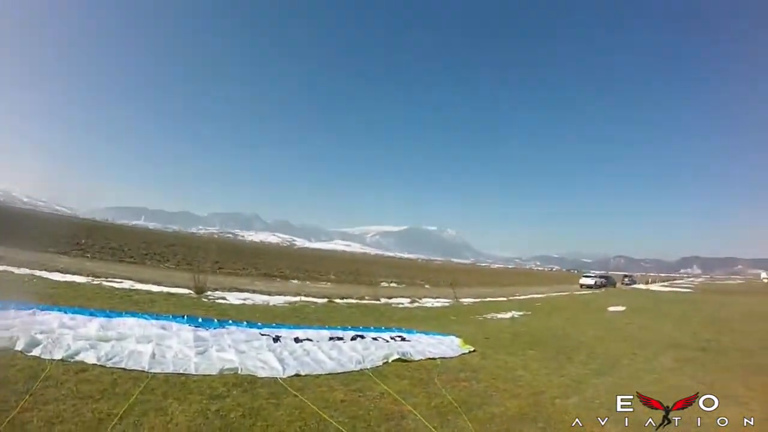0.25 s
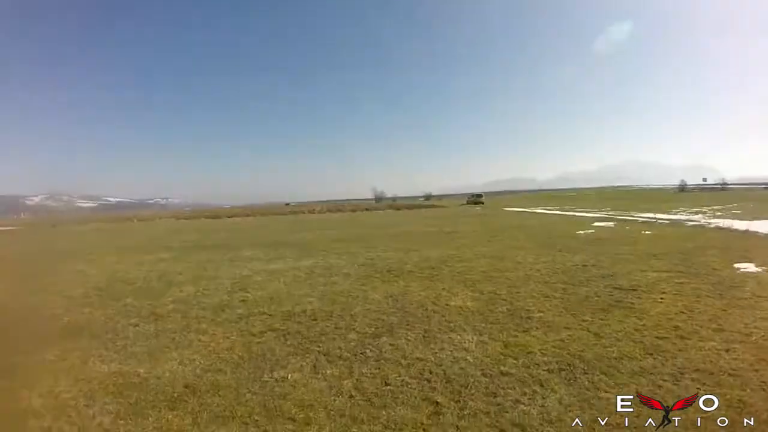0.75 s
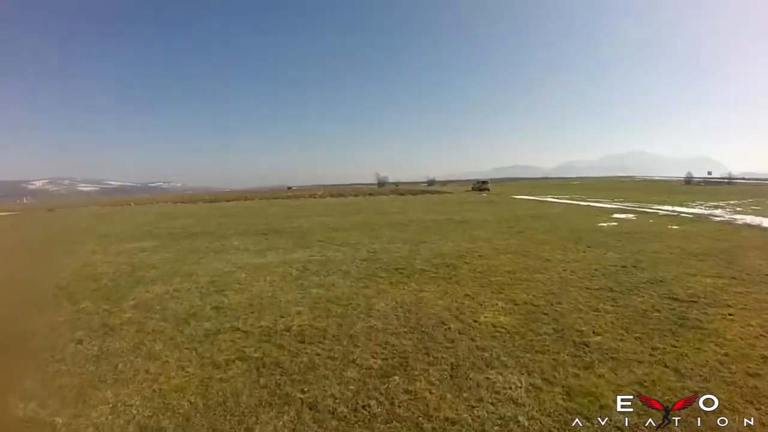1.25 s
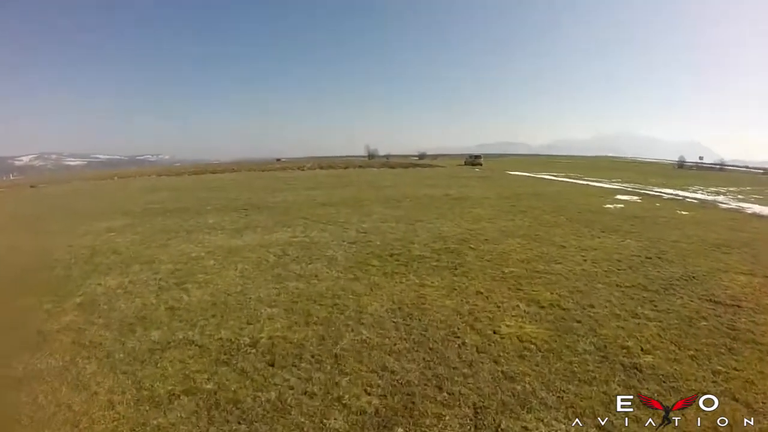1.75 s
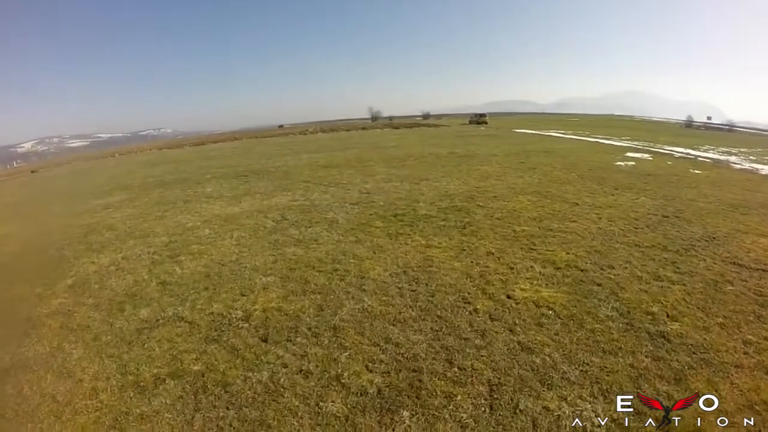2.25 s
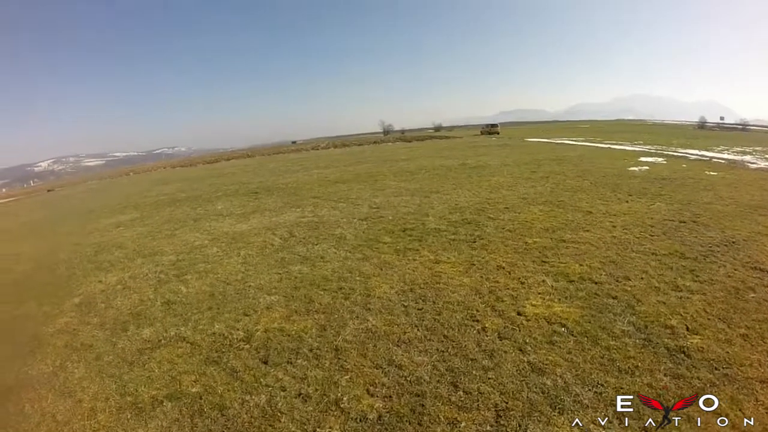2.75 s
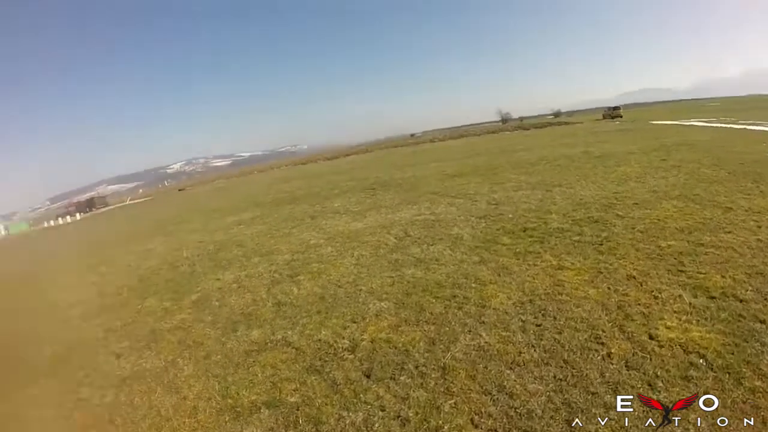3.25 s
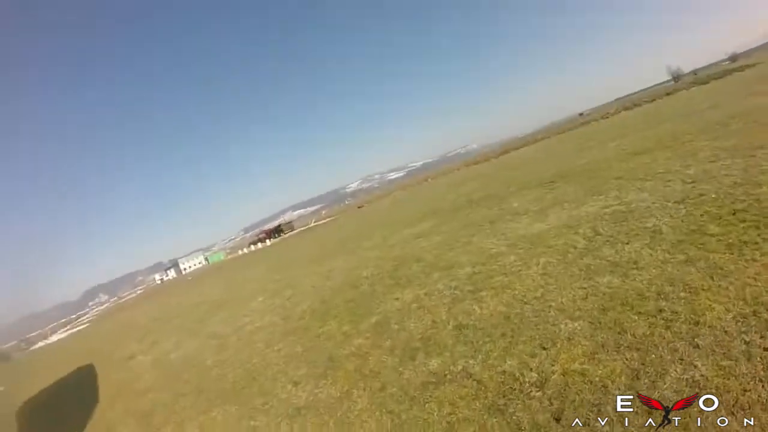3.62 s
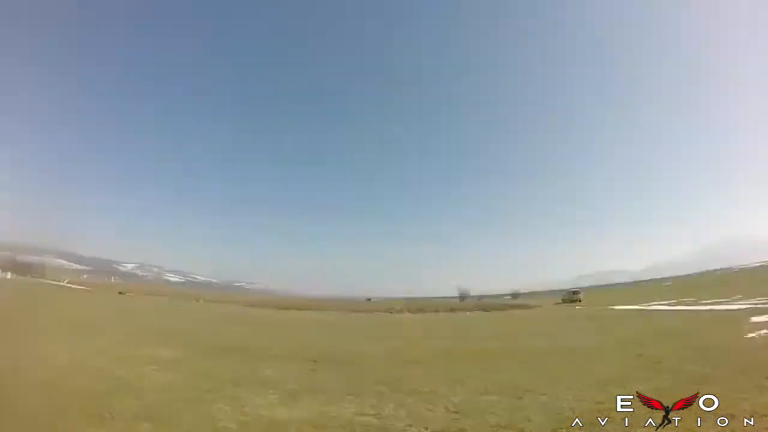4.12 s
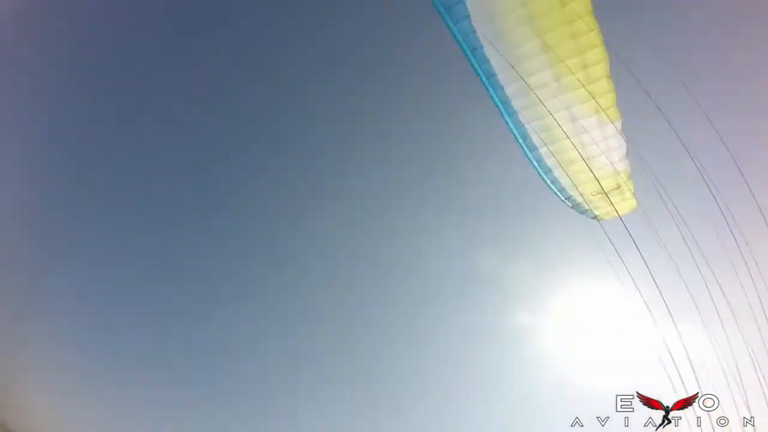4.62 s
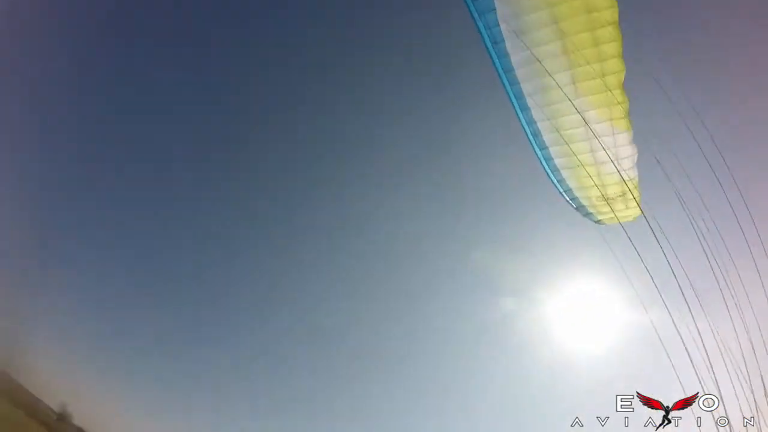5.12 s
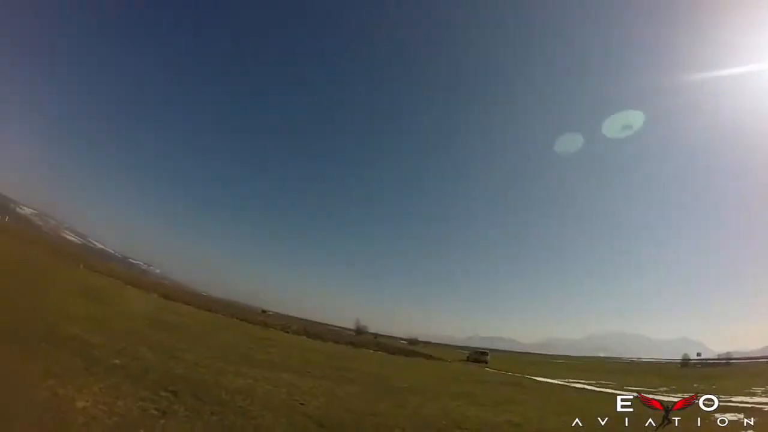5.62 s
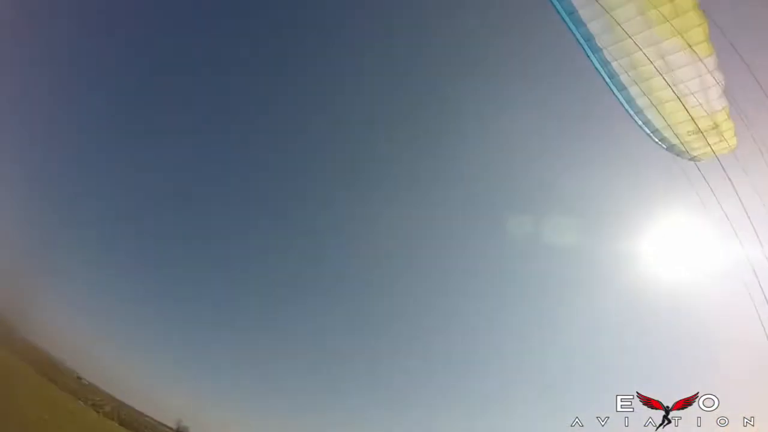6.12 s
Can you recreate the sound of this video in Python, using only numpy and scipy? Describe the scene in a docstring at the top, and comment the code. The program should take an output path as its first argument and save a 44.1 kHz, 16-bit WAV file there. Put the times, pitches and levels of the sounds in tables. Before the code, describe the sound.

A small two-stroke motor putters unevenly amid clicking buckles, then revs abruptly into a harsh snarl that gives way to a rising, chopping propeller roar.

```python
"""A small two-stroke paramotor idles unevenly on the pilot's back, amid clicking buckles and buffeting air.
Early on its sound switches abruptly from resonant and humming to clearer. As the throttle opens it fires on
every turn, and the clutch then drags the propeller up to speed. Firing pulses excite resonances of silencer,
air box, pipe wall and metal; blade passes are a harmonic series with noise riding on it; air is filtered
noise; straps and buckles are decaying noise bursts and modes."""
import sys
import numpy as np
from scipy import signal
from scipy.fft import rfft, irfft, next_fast_len
from scipy.io import wavfile
from scipy.ndimage import uniform_filter1d

SR = 44100
rng = np.random.default_rng(int(sys.argv[2]) if len(sys.argv) > 2 else 0)


def output_pcm(signal):
    """Save a mono or channel-first signal as 16-bit PCM at the path in sys.argv[1].

    Samples are clipped to [-1, 1] before scaling.
    """
    pcm = np.clip(np.atleast_2d(signal).T, -1, 1) * 32767
    wavfile.write(sys.argv[1], SR, np.round(pcm).astype(np.int16))


N = 281358
T = np.arange(N) / SR  # seconds
SWITCH_S = .715  # the sound switches abruptly here: resonant and humming before, clearer after
# throttle opens, is fully open, engine strains hardest, clutch grips, clutch nearly locks
OPEN_S, FULL_S, STRAIN_S, GRIP_S, LOCK_S = 3.98, 4.15, 4.33, 4.448, 4.62


def gain_of(db):
    """Level is logarithmic: turns decibels into an amplitude ratio."""
    return 10 ** (np.asarray(db) / 20)


def evened(x):
    """Loudness follows mean power: scales a signal to rms 1."""
    return x / np.sqrt(np.mean(x ** 2) + 1e-20)


def curves(rows):
    """Linear interpolation in time: each column of a table becomes a curve over all samples."""
    s, *columns = np.transpose(rows)
    return [np.interp(T, s, c) for c in columns]


def coloured(x, points):
    """Spectral shaping: filters by (Hz, dB) points joined on a log-frequency axis."""
    hz, db = np.transpose(points)
    size = next_fast_len(len(x))
    f = np.fft.rfftfreq(size, 1 / SR)
    response_db = np.interp(np.log(f + 1), np.log(hz + 1), db)
    return irfft(rfft(x, size) * gain_of(response_db), size)[:len(x)]


def ring(x, modes):
    """Modal resonance: a sum of resonators (Hz, width Hz, dB), each of peak gain set by its dB."""
    total = 0
    for hz, width, db in modes:
        b, a = signal.iirpeak(hz, hz / max(width, 5), SR)
        total = total + gain_of(db) * signal.lfilter(b, a, x)
    return total


def wander(per_s):
    """Random modulation: noise of rms 1, low-passed above per_s hertz."""
    return evened(coloured(rng.standard_normal(N), [(0, 0), (per_s, 0), (3 * per_s, -40), (SR, -120)]))


def stage(levels):
    """Level follows load: a value through the five throttle moments, held before and after."""
    return np.interp(T, [OPEN_S, FULL_S, STRAIN_S, GRIP_S, LOCK_S], levels)


def idling():
    """Load-dependent level: bustle, ring and boom in dB, fading to no change as the throttle opens."""
    # Each row: time in seconds, then change in dB of the pilot's bustle, ringing metal and silencer boom,
    # against the level at throttle opening.
    idle_changes = [(0, 1, -9, -11), (.65, 2, -2, 9), (.95, 4, -2.5, -10), (1.2, 3, 0, 6),
                    (1.45, 5.5, -8.5, 8.5), (1.8, 2.5, -3, 4), (2.3, 1.5, -1, 9.5), (2.8, 2.5, -3.5, 7),
                    (3.35, 2.5, -11, 7), (3.6, 2.5, -0.5, 3), (3.9, 3.5, -3, 3)]
    return [c * stage([1, 0, 0, 0, 0]) for c in curves(idle_changes)]


def stumble_db():
    """Shared excitation: one brief gasp of the engine dips the metal and the pipe wall together."""
    stumble_s, wide_s, depth_db = 4.04, 0.0056, -6
    return depth_db * np.exp(-.5 * ((T - stumble_s) / wide_s) ** 2)


def blades_hz():
    """Rotational inertia: blade passes a second, zero until the clutch bites, then a surge and steady climb."""
    bite_s, bite_hz = 4.18, 17.3
    surge_hz, surge_s, climb_hz_per_s = 30.43, .3062, 13.449
    u = np.maximum(T - bite_s, 0)
    surge = surge_hz * (1 - np.exp(-u / surge_s))
    return (bite_hz + surge + climb_hz_per_s * u) * (u > 0)


def buffet():
    """Turbulent pressure: lumpy low air noise on the microphone."""
    # Each row: frequency in Hz, level in dB.
    buffet_colour = [(15, -27), (35, -11.5), (80, -4.5), (150, -9), (300, -12), (600, -36), (2000, -55.5)]
    lumps = gain_of(1.85 * wander(22.0)) * rng.standard_normal(N)
    # follows the bustle 2.4 dB per dB; fades 4 dB per second under power
    level_db = -33 + 2.4 * idling()[0] - 4 * np.maximum(T - STRAIN_S, 0)
    return gain_of(level_db) * evened(coloured(lumps, buffet_colour))


def slipstream():
    """Turbulent flow noise: a dull rush through cage and net that grows with propeller speed."""
    # Each row: frequency in Hz, level in dB.
    wash_colour = [(60, -23), (150, 7.5), (300, 6), (600, 2.5), (1200, -6), (3000, -38.5)]
    rush = evened(coloured(gain_of(1.9 * wander(45)) * rng.standard_normal(N), wash_colour))
    return gain_of(-26.0) * (blades_hz() / 70) ** 0.2 * rush


def bumps():
    """Damped oscillation: soft low thumps, sagging in pitch, as the harness settles against the body."""
    # Each row: start in seconds, level in dB before a common cut of 5.5 dB, starting pitch in Hz.
    settling = [(1.182, -11, 72.7), (1.442, -12.5, 108), (1.515, -13, 134)]
    t = np.arange(6000) / SR
    onset = np.minimum(t / 0.0068, 1)
    out = np.zeros(N + len(t))
    for s, db, hz in settling:
        decay = gain_of(db - 5.5 - 60 * t / 0.15)
        out[round(s * SR):][:len(t)] += decay * onset * np.sin(2 * np.pi * hz * t * (1 - .8 * t))
    return out[:N]


def clicks_and_buckles():
    """Impact and free decay: clicks snap with a dull thud, buckles crackle and clink in their own modes."""
    # The first row is a faint click at the abrupt switch of sound; the others are straps of webbing.
    # Each row: start in seconds, snap level in dB, thud level in dB.
    clicks = [(0.715, -38, -47), (0.738, -25, -48), (0.8316, -18.5, -26.5), (0.9004, -27.5, -31),
              (0.922, -28, -46), (0.9724, -20.5, -45), (1.0162, -33, -49), (1.0726, -25, -44),
              (1.184, -26, -27), (1.197, -17.5, -41), (1.229, -18.5, -25), (1.2412, -20.5, -48),
              (1.397, -23, -55), (1.486, -21.5, -29), (1.523, -24.5, -45), (1.817, -28, -36),
              (1.8982, -28, -42), (1.926, -28.5, -50), (2.2962, -27.5, -44), (2.407, -31, -46),
              (3.338, -18.5, -55), (3.35, -20.5, -46), (3.435, -20, -36), (3.5554, -26, -29),
              (3.723, -19.5, -26), (3.829, -27, -51), (3.846, -21, -25.5), (3.947, -15.5, -23),
              (3.964, -19, -28), (4.458, -30, -20.5), (4.505, -30, -25.5), (4.702, -39, -24)]
    # Buckles. Each row: start in seconds, crackle level in dB, clink level in dB.
    clinks = [(0.833, -17, -51), (0.898, -29, -60), (1.5226, -30, -54), (3.3368, -7, -16.5),
              (3.379, -28, -60), (3.434, -20, -58), (3.6246, -26, -50), (3.698, -33, -46),
              (3.719, -19, -37), (3.8302, -32, -58), (3.948, -30, -56)]
    # Buckle modes. Each row: frequency in Hz, level in dB, time to fall 60 dB in seconds.
    buckle_modes = [(8759, -17, .09), (9668, 0, .085), (10550, -19, .07), (11420, -18, .05),
                    (13500, -9, .025)]
    snap_colour = [(1200, 15.0), (2500, 13.0), (3700, 12), (4500, 15.5),
                   (6000, 2), (7500, 8.5), (8800, -7.5), (15500, -12)]  # (Hz, dB)
    thud_colour = [(300, 2), (1050, 25), (2000, 4.5), (4000, -59)]
    crackle_colour = [(7000, -16), (10000, 10), (16000, -8)]
    t = np.arange(4000) / SR
    clink = sum(gain_of(db - 60 * t / t60) * np.sin(2 * np.pi * hz * t) for hz, db, t60 in buckle_modes)
    out = np.zeros(N + len(t))
    for s, snap_db, thud_db in clicks:
        snap = evened(coloured(rng.standard_normal(len(t)), snap_colour))
        thud = evened(coloured(rng.standard_normal(len(t)), thud_colour))
        sound = gain_of(snap_db - 60 * t / 0.031) * snap + gain_of(thud_db - 60 * t / 0.14) * thud
        out[round(s * SR):][:len(t)] += np.minimum(t / 0.00071, 1) * sound
    for s, crackle_db, clink_db in clinks:
        # a short burst with a faint longer tail
        decay = gain_of(crackle_db - 60 * t / 0.0054) + gain_of(crackle_db - 34 - 60 * t / .09)
        crackle = decay * evened(coloured(rng.standard_normal(len(t)), crackle_colour))
        out[round(s * SR):][:len(t)] += np.minimum(t / 0.00097, 1) * (crackle + gain_of(clink_db) * clink)
    return out[:N]


def propeller():
    """Blade-passing tone: pressure builds slowly and drops fast at each pass, and eddy noise rides the drop."""
    # Helmet between propeller and microphone. Each row: time in seconds, shading as a share 0-1.
    helmet_shade = [(4.3, 0), (4.6, 0.66), (4.8, 0.84), (5.2, 0.87), (5.45, 0.57), (5.6, 0.14),
                    (5.95, 0.07), (6.38, 0.36)]
    # Each row: time in seconds, swish level in dB.
    swish_levels = [(4.3, -37), (4.7, -36), (5.1, -34.5), (5.3, -31), (5.6, -30), (6, -29.5), (6.38, -29)]
    # Each row: multiple of the blade rate, level in dB against the second harmonic.
    overtones = [(3, -8), (4, -11), (5, -16.5), (6, -17), (7, -31.5)]
    # Colours of the swish and of the tip hiss. Each row: frequency in Hz, level in dB.
    swish_colour = [(150, -1), (500, -13), (1200, -5), (2400, -7.5), (3500, -21.5), (5100, -32),
                    (7300, -40), (15500, -58)]
    tip_colour = [(1500, -5), (3000, 3.5), (4500, 5), (5200, -12), (6200, -8.5), (7300, -5), (8500, -17),
                  (15500, -23)]
    thump_db, second_db, hiss_db = -12.5, -21, -36.5  # at final speed, unshaded, before the frame's shake
    hz, shade = blades_hz(), np.clip(curves(helmet_shade)[0], 0, 1)
    octaves = np.log2(np.maximum(hz, 1) / hz[-1])
    # the frame shakes in sympathy as the blades pass 40 Hz
    shake_db = 6 * np.exp(-.5 * ((hz - 40) / 9) ** 2)
    thump_curve_db = thump_db + 6.4 * octaves + shake_db - 3 * shade
    second_curve_db = second_db + 0.14 * octaves + 0.48 * shake_db
    angle = np.cumsum(hz) / SR + .767 + .004 * wander(15)  # in blade passes
    tone = gain_of(thump_curve_db) * np.sin(2 * np.pi * angle + 0.39)
    tone += gain_of(second_curve_db) * np.sin(4 * np.pi * angle)
    for k, db in overtones:
        tone += gain_of(second_curve_db + db + 3.0 * wander(4)) * np.sin(2 * np.pi * k * angle)
    drop = np.exp(2.7 * (np.cos(2 * np.pi * (angle - .02)) - 1))
    for db, colour in ((curves(swish_levels)[0], swish_colour), (hiss_db - 16 * shade, tip_colour)):
        eddies = (.26 + drop * gain_of(1.3 * wander(35))) * rng.standard_normal(N)
        tone += gain_of(db) * evened(coloured(eddies, colour))
    fade_in = np.clip((T - 4.18) / 0.16, 0, 1)  # from the bite of the clutch
    return -np.sqrt(2) * fade_in * tone


def intake(start):
    """Cavity resonance: each turn gulps air softly and keeps the air box humming."""
    # Air box after the abrupt switch of sound, then before it.
    # Each row: frequency in Hz, width in Hz, gain in dB.
    box_after = [(338.6, 29, 19), (273, 43, 11.5), (407, 13, 4), (267, 17, 2), (193, 9, -10), (120, 12, 24),
                 (53, 7.6, 27)]
    box_before = [(290.6, 12, 20), (342, 21, 23), (420, 31, 13), (176, 17, -2), (125, 22, 8)]
    # Level in dB at each of the five throttle moments.
    hum_db = -36, -31, -34, -37, -38.5
    gulps = .006 * rng.standard_normal(N)
    gulps[start] += 1
    gulps = np.convolve(gulps, np.hanning(40))[:N]
    level_db = stage(hum_db) - 0.5 * np.maximum(OPEN_S - T, 0)
    after = gain_of(level_db) * evened(ring(gulps, box_after))
    before = ring(gulps * (T < SWITCH_S), box_before)
    before = gain_of(-30.5) * before / before[T < SWITCH_S].std()
    return after * (T > SWITCH_S) + before


def rattle(angle, db):
    """Impact excitation: piston slap shakes the metal ahead of the exhaust, harder on turns that fire."""
    # Fins and frame after the abrupt switch of sound, then the metal heard before it.
    # Each row: frequency in Hz, width in Hz, gain in dB of one of two passes.
    metal_after = [(1060, 90, 2), (1580, 130, 4), (1930, 60, 8), (2058, 35, 6), (2330, 160, -8),
                   (2865, 50, 4), (3017, 60, 2), (3280, 65, 5), (3520, 170, 3), (4550, 390, -1),
                   (7420, 230, -4)]
    metal_before = [(1200, 200, 5), (1560, 220, 4), (2150, 260, 6), (3020, 170, 8.5), (3500, 300, 4),
                    (4320, 120, 7), (5170, 280, 2), (7200, 600, -4)]
    # Colours of the clatter and of the steady hiss of cooling air. Each row: frequency in Hz, level in dB.
    clatter_colour = [(300, 5), (700, -5), (1200, -3), (2000, -6), (3400, -8), (4700, -20.5), (6000, -24.5),
                      (7500, -14.5), (8500, -27), (15500, -33)]
    fan_colour = [(2000, -19), (4500, 14), (6100, -2), (7400, -24), (8600, -3), (15500, -28)]
    # Clatter and ring: level in dB at each of the five throttle moments.
    clatter_levels = -37, -25.5, -23.5, -27.5, -45.5
    ring_levels = -39, -27, -31, -34, -50
    bustle_db, ring_db, _ = idling()
    clatter_db = stage(clatter_levels) + bustle_db + stumble_db()
    early = angle + .34  # turns; slap from top dead centre
    turn = np.minimum(early.astype(int), len(db) - 1)
    since = early % 1
    harder = gain_of(.4 * (db - uniform_filter1d(db, size=9)))[turn]  # against neighbouring turns
    gate = 1.74 + harder * np.exp(-since / 0.44)
    shake = gate * rng.standard_normal(N) * gain_of(1.47 * wander(65))
    clatter = gain_of(clatter_db) * evened(coloured(shake, clatter_colour))
    strike = (.3 + harder ** 1.7 * np.exp(-since / .3)) * rng.standard_normal(N)
    after, before = (evened(ring(ring(strike, modes), modes)) for modes in (metal_after, metal_before))
    ringing = gain_of(stage(ring_levels) + ring_db + stumble_db()) * np.where(T > SWITCH_S, after, before)
    fan_noise = gain_of(2.0 * wander(51)) * rng.standard_normal(N)
    fan_db = clatter_db - 14.0 - 11 * (T < SWITCH_S)  # fainter before the switch
    return clatter + ringing + gain_of(fan_db) * evened(coloured(fan_noise, fan_colour))


def pipe_wall(start):
    """Structural resonance: under power each firing knocks the pipe wall, with a gritty scatter behind it."""
    # Lower modes, then upper modes, brightest under strain.
    # Each row: frequency in Hz, width in Hz, gain in dB of one of two passes.
    low_modes = [(260, 62, 8), (540, 39, 16.5), (666, 47, 21), (723, 44, 18), (1050, 59, 16),
                 (1150, 203, 20.5), (1955, 76, 17.5), (2060, 140, 13), (2290, 57, 20)]
    top_modes = [(3310, 130, 15), (3530, 200, 15), (4180, 360, 13.5), (5150, 330, 6)]
    # Lower and upper modes: level in dB at each of the five throttle moments.
    low_db = -26.5, -22.5, -21, -27, -48
    top_db = -38, -35, -28, -34, -45.5
    luck = rng.standard_normal((len(start), 2))
    shift = np.round(.0001 * SR * luck[:, 0]).astype(int)  # a little early or late
    knocks = np.zeros(N)
    knocks[np.clip(start + shift, 0, N - 1)] = gain_of(1.1 * luck[:, 1])
    blunt = np.convolve(knocks, np.hanning(12))[:N]
    tail = signal.lfilter([1], [1, -np.exp(-1 / (.007 * SR))], knocks)
    grit = tail * rng.standard_normal(N)
    drive = np.roll(blunt + .2 * grit, 130)  # later by 130 samples
    low, top = (evened(ring(ring(drive, modes), modes)) for modes in (low_modes, top_modes))
    wall = gain_of(stage(low_db)) * low + gain_of(stage(top_db)) * top
    return gain_of(stumble_db()) * (T > OPEN_S) * wall


def crank():
    """Cyclic combustion: crank angle in turns, with the start sample and blow in dB of each turn."""
    # Strong firings at idle. Each row: time in seconds, blow in dB.
    firings = [(0.016, -11), (0.12, -7.5), (0.307, -9), (0.409, -8.5), (0.529, -16.5), (0.59, -17),
               (0.712, -15), (0.744, -12.5), (0.863, -11), (0.941, -13), (1.04, -15), (1.079, -12),
               (1.194, -17.5), (1.313, -13.5), (1.454, -18), (1.572, -15.5), (1.65, -14.5), (1.69, -14.5),
               (1.786, -11.5), (1.865, -14), (1.942, -17), (2.057, -18), (2.096, -17.5), (2.133, -19),
               (2.171, -16.5), (2.247, -17), (2.285, -18), (2.323, -21), (2.378, -19.5), (2.454, -17.5),
               (2.492, -15.5), (2.585, -12.5), (2.807, -16), (2.921, -19), (2.995, -15.5), (3.07, -20.5),
               (3.127, -14.5), (3.2, -15.5), (3.424, -14.5), (3.57, -13), (3.647, -17), (3.739, -16),
               (3.811, -10), (3.878, -9.5), (3.944, -9.5), (3.992, -8.5)]
    # Each row: time in seconds, nominal idle speed in crank turns a second.
    idle_speed = [(0, 48.5), (.7, 49), (.8, 51), (2, 52.5), (3.7, 54.5), (3.85, 59), (4, 63)]
    # Blow in dB at each of the five throttle moments.
    power_blow_db = -15, -7.5, -9.5, -11.5, -25.5
    open_hz, slip_hz, rev_s = 62.06, 66.6, .1  # crank settles from first to second speed as the clutch slips
    gear = 1.392  # crank turns per blade pass once the clutch has locked
    s, blow_db = np.transpose(firings)
    rate = np.interp(s[1:], *np.transpose(idle_speed))
    # at idle, whole turns lie evenly between strong firings
    at = 1 + np.r_[0, np.cumsum(np.round(np.diff(s) * rate))].astype(int)
    slipping_hz = slip_hz - (slip_hz - open_hz) * np.exp(-np.maximum(T - s[-1], 0) / rev_s)
    hz = np.maximum(slipping_hz, gear * blades_hz())
    angle = np.interp(T, np.r_[s[0] - 1 / rate[0], s], np.r_[0, at])
    angle = angle + np.cumsum(hz * (T > s[-1])) / SR
    turn = np.arange(int(angle[-1]) + 1)
    luck = rng.standard_normal(len(turn))
    # a weak mixture lights every second turn up to a strong firing
    until = at[np.minimum(np.searchsorted(at, turn), len(at) - 1)] - turn
    db = np.where(until % 2 == 0, -22 + 1.2 * luck, -40 + 1.3 * luck)
    db[at] = blow_db
    start = np.searchsorted(angle, turn).clip(0, N - 1)
    # under power every turn fires evenly, fading 10 dB per second in the end
    power_db = stage(power_blow_db) - 10 * np.maximum(T - LOCK_S, 0)
    db = np.where(turn > at[-1], power_db[start] + .5 * luck, db)
    return angle, start, db


def exhaust(start, db):
    """Gas-pulse radiation: a sharp dip as the port opens, its pipe echo and a soft puff ring the silencer."""
    # Each row: frequency in Hz, width in Hz, gain in dB.
    silencer_modes = [(130, 11, -5), (186.6, 7.7, 0), (305, 113, -11), (418, 59, -3.5), (548, 40, -10),
                      (746, 20, -8)]
    # Colour of the exhaust under power. Each row: frequency in Hz, level in dB.
    hot_pipe_colour = [(60, 8), (132, -3.5), (198, 1), (264, 5), (330, -1), (430, -11), (530, 4), (740, 0),
                       (810, -8), (1500, -2)]
    # Silencer gain in dB at each of the five throttle moments.
    boom_db = -0.5, -27, -32, -22, -21
    t = np.arange(1200) / SR

    def dip(s, wide):
        """Gaussian pulse: a rarefaction centred at s seconds."""
        return -np.exp(-.5 * ((t - s) / wide) ** 2)

    blows, puffs = np.zeros((2, N))
    blows[start] = gain_of(db)
    puffs[start] = gain_of(-10.5 + 1.4 * rng.standard_normal(len(start)) + 0.54 * (db + 11.0))
    port = dip(.0028, .00038) + .42 * dip(.0084, .0008) - .72 * dip(.005, .0013)
    port = gain_of(4.0) * port
    puff = dip(.0045, .0011)
    pulse = signal.oaconvolve(blows, port)[:N] + signal.oaconvolve(puffs, puff)[:N]
    pulse = signal.lfilter(*signal.butter(1, 75, "high", fs=SR), pulse)
    pulse = pulse + gain_of(stage(boom_db) + idling()[2]) * ring(pulse, silencer_modes)
    hot = stage([0, 1, 1, 1, 1])
    return (1 - hot) * pulse + hot * coloured(pulse, hot_pipe_colour)


def scene():
    """Superposition: engine, propeller, air, clicks and harness add at one microphone."""
    angle, start, db = crank()
    engine = exhaust(start, db) + rattle(angle, db) + pipe_wall(start) + intake(start)
    return (engine + propeller() + slipstream() + buffet() + clicks_and_buckles() + bumps())[None]


def record(dry):
    """Band limiting: a linear-phase low-pass at 15350 Hz."""
    low_pass = signal.firwin(511, 15350, window=("kaiser", 9), fs=SR)
    return signal.oaconvolve(dry, low_pass[None], "same")


dry = scene()
out = record(dry)
output_pcm(out)
```